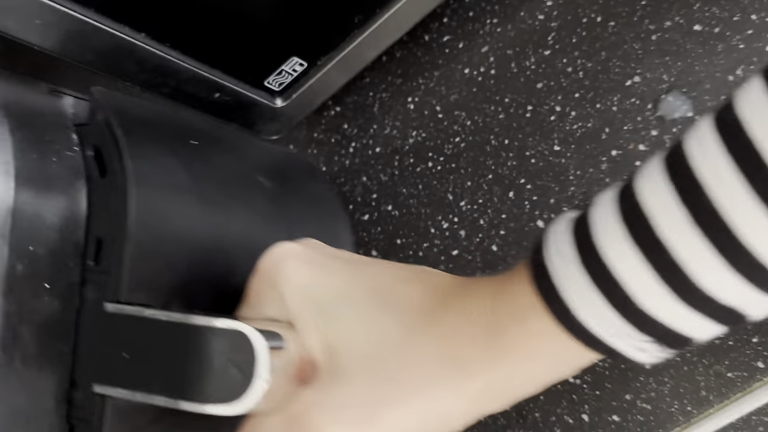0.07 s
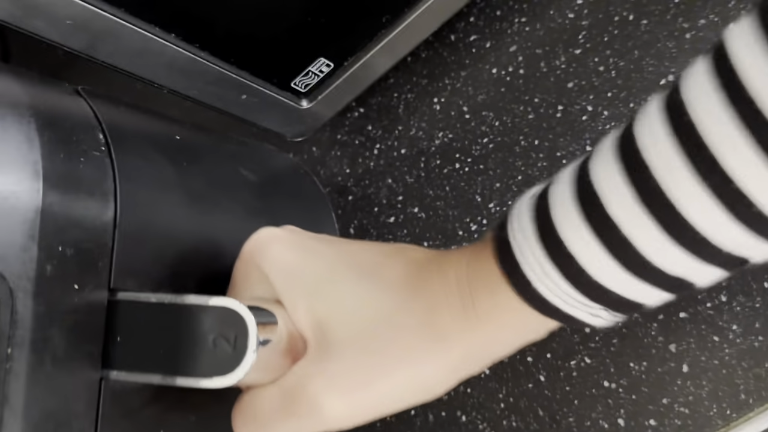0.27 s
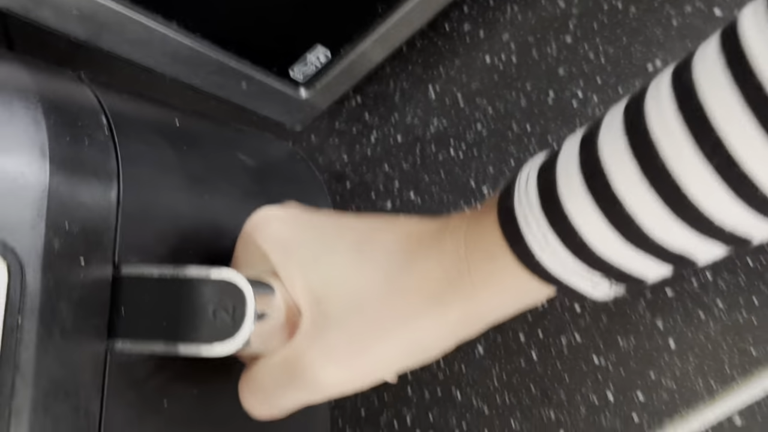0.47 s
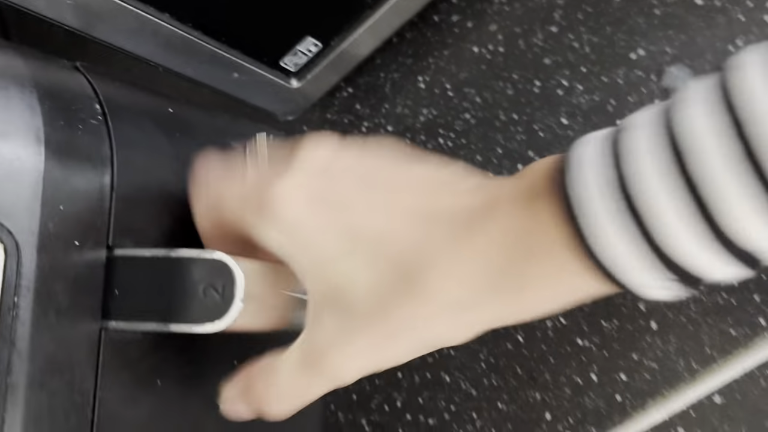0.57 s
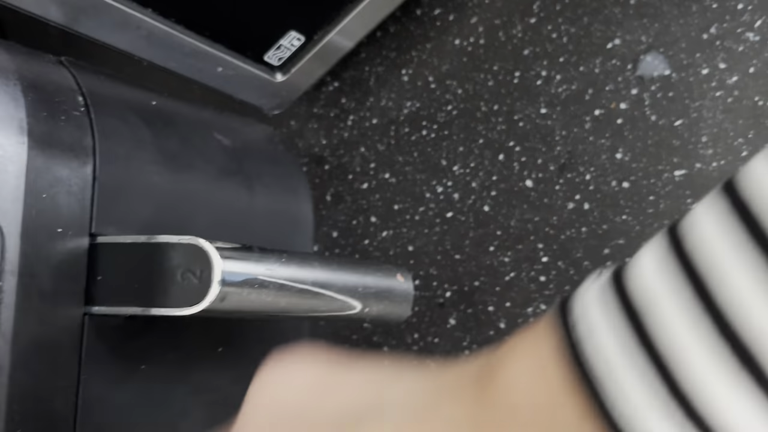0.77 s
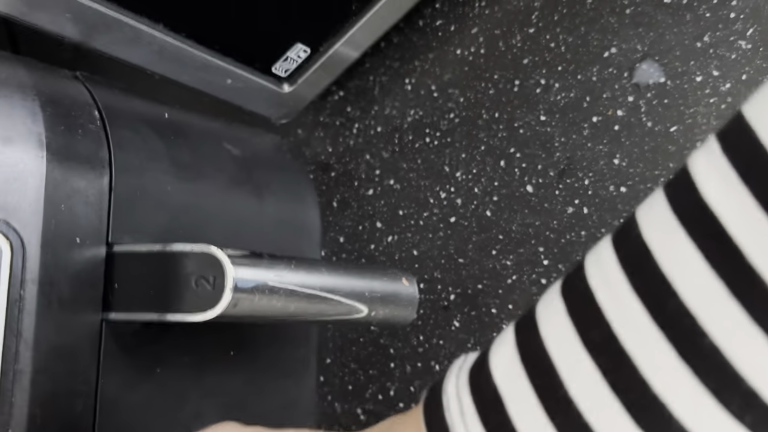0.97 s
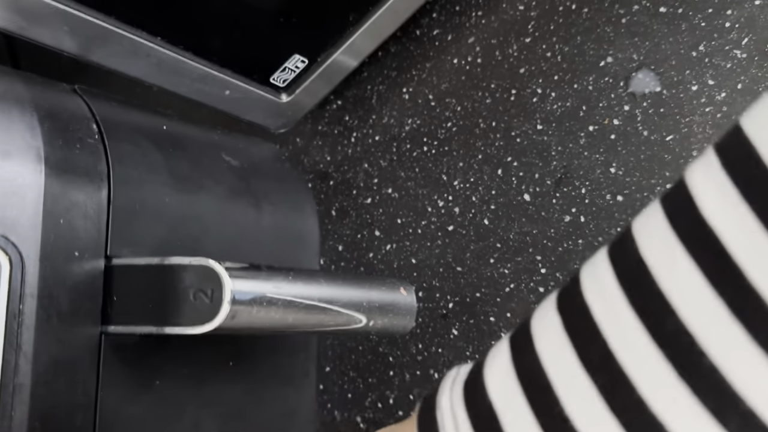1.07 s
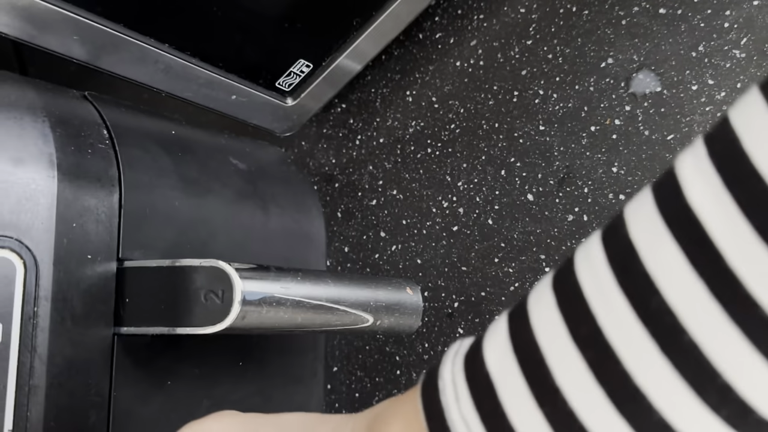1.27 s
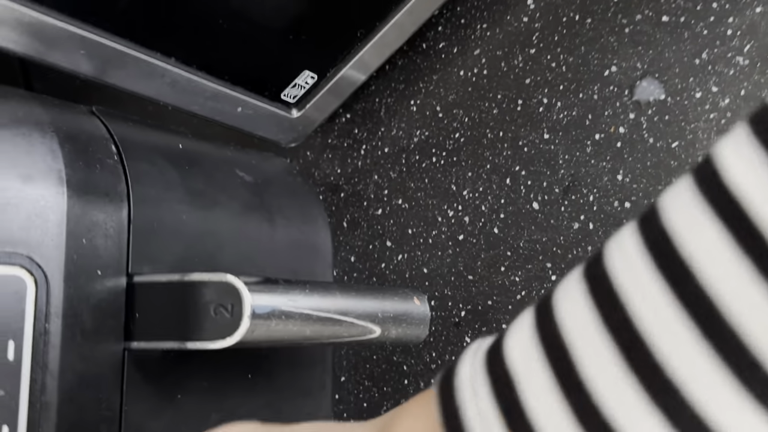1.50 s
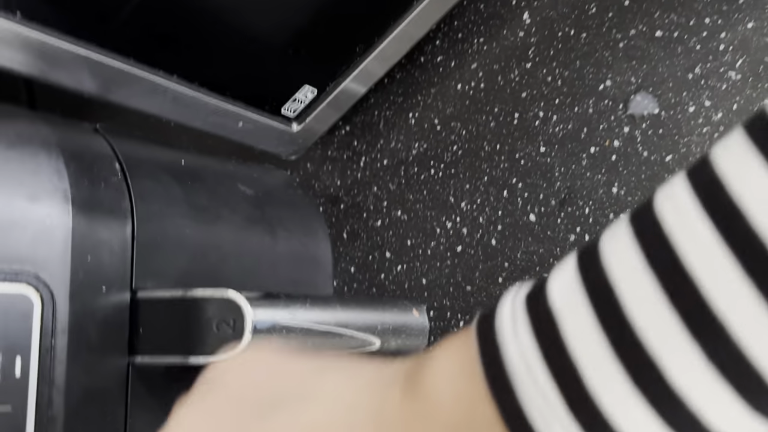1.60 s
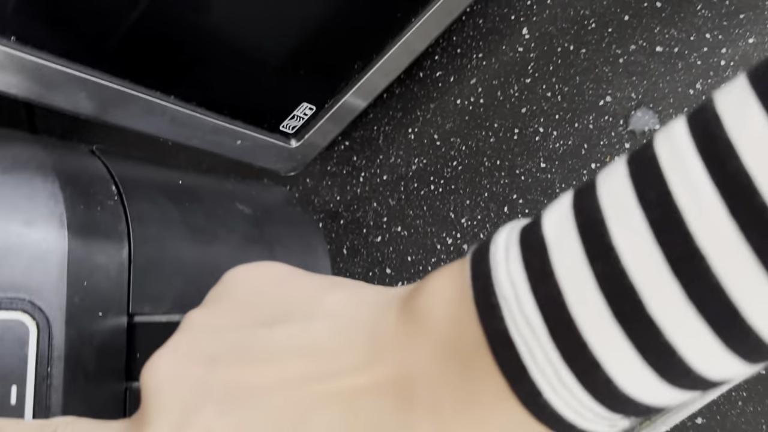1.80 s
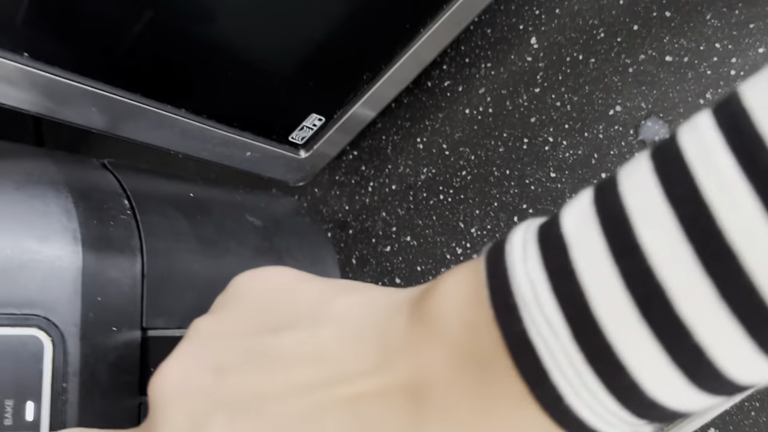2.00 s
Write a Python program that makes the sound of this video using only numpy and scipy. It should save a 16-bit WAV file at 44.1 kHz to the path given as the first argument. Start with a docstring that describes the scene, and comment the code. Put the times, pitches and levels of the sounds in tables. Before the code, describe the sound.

An air fryer drawer knocks shut, then a control clicks down and up twice.

```python
"""A small kitchen: quiet air, faint appliance hum, a deep tone that swells and fades throughout.
A hand shifts on the handle of an air fryer's plastic drawer and pushes it home. The drawer knocks on
the housing and scrapes over runners and catch; the appliance booms on its feet, the catch snaps,
the drawer seats with a low clunk and the hand lets go. Then a control clicks down and up, twice."""
import sys
import numpy as np
from scipy import signal
from scipy.fft import rfft, irfft, next_fast_len
from scipy.io import wavfile

SR = 44100
rng = np.random.default_rng(int(sys.argv[2]) if len(sys.argv) > 2 else 0)


def log_audio(samples):
    """Write samples as a 16-bit WAV file to the path given in sys.argv[1]."""
    # one column per channel
    frames = np.atleast_2d(samples).T
    # limit to full scale, then quantise
    limited = np.clip(frames, -1, 1)
    pcm = np.round(limited * 32767).astype(np.int16)
    wavfile.write(sys.argv[1], SR, pcm)


N = 90404


def from_db(db):
    """Decibels to gain."""
    return 10 ** (np.asarray(db) / 20)


def seconds():
    """Sample times."""
    return np.arange(N) / SR


def noise():
    """White noise, rms 1."""
    return rng.standard_normal(N)


def decay(start_s, t60_s):
    """Step to 1, then exponential decay."""
    age_s = seconds() - start_s
    return (age_s >= 0) * np.exp(-np.log(1000) * np.maximum(age_s, 0) / t60_s)


def drift(corner_hz):
    """Smooth random drift, standard deviation 1."""
    hop, settle = 40, 2000
    pole = np.exp(-2 * np.pi * corner_hz * hop / SR)
    white = rng.standard_normal(N // hop + settle + 2)
    slow = signal.lfilter([1], [1, -2 * pole, pole * pole], white)[settle:]
    return np.interp(np.arange(N) / hop, np.arange(len(slow)), slow / slow.std())


def coloured(x, spectrum, treble_db=0):
    """Minimum-phase filter: spectrum (f/Hz, level/dB) scaled to unit power gain, then a 3 kHz shelf."""
    size = 2 * next_fast_len(N)
    hz = np.maximum(np.arange(size // 2 + 1) * SR / size, 1)
    points_hz, db = np.transpose(spectrum)
    gain = from_db(np.interp(np.log(hz), np.log(points_hz), db))
    shelf = from_db(treble_db * hz ** 2 / (hz ** 2 + 3000 ** 2))
    gain = gain / np.sqrt(np.mean(gain ** 2)) * shelf
    cepstrum = irfft(np.log(gain))
    causal = np.r_[cepstrum[0], 2 * cepstrum[1:size // 2]]
    return irfft(rfft(x, size) * np.exp(rfft(causal, size)))[:N]


def ring(start_s, hz, t60_s):
    """One struck mode."""
    return decay(start_s, t60_s) * np.sin(2 * np.pi * hz * (seconds() - start_s))


def crack(start_s, t60_s):
    """Dense tiny modes as a decaying noise burst."""
    return decay(start_s, t60_s) * rng.choice([-1, 1], N)


def contact(start_s, rise_s):
    """Plastic yields, so force builds gradually."""
    return 1 - np.exp(-np.maximum(seconds() - start_s, 0) / rise_s)


def air():
    """Room air: steady dark noise."""
    # noise spectrum: f/Hz, relative density/dB
    spectrum = [(20, -28), (35, 3.5), (60, -0.5), (90, -1), (160, 0), (240, -2), (320, -9), (390, -4.5),
                (480, -10.5), (600, -10.5), (900, -14), (1250, -19.5), (1650, -20), (1950, -21.5),
                (2300, -21.5), (2750, -29.5), (3400, -31), (4700, -34), (7700, -33.5), (10000, -48),
                (15000, -59.5)]
    return from_db(-52) * coloured(noise(), spectrum)


def hum():
    """Appliance hum: faint wavering lines over a deep tone that swells and fades."""
    # deep tone's envelope: t/s, rms level/dB
    swell = [(0, -52), (0.15, -69), (0.25, -48.5), (0.54, -53), (0.64, -61), (0.88, -52.5), (1.03, -46),
             (1.25, -45), (1.33, -54), (1.39, -62), (1.44, -51), (1.54, -44), (1.68, -43.5), (1.85, -51),
             (2.05, -48.5)]
    # hum lines: f/Hz, rms level/dB
    lines = [(100, -59), (134, -60.5), (226, -64.5), (268.5, -59), (426, -68), (490, -74.5), (581, -72),
             (1022, -75.5), (1610, -80.5), (2126, -78.5), (2304, -82.5), (3400, -85)]
    deep_hz, wander_hz, waver_db = 52.45, 1.85, 3
    t = seconds()
    out = from_db(np.interp(t, *np.transpose(swell))) * np.sin(2 * np.pi * deep_hz * t)
    for hz, db in lines:
        cycles = np.cumsum(hz + wander_hz * drift(corner_hz=3.26)) / SR + rng.random()
        out += from_db(db + waver_db * drift(corner_hz=4.4)) * np.sin(2 * np.pi * cycles)
    return np.sqrt(2) * out


def hand():
    """Skin brushes the handle as the hand shifts and lets go."""
    # brushes: t/s, length/s, level/dB
    brushes = [(0.146, 0.012, -68), (0.569, 0.035, -66.5), (0.608, 0.015, -65)]
    # skin friction: f/Hz, relative density/dB
    spectrum = [(1000, -11), (3000, -5.5), (6500, 9), (9000, -2.5), (15000, -11)]
    touch = sum(from_db(db) * np.exp(-2 * ((seconds() - peak_s) / length_s) ** 2)
                for peak_s, length_s, db in brushes)
    return coloured(touch * noise(), spectrum)


def knocks():
    """Knocks ring the hollow drawer; walls crack, loose parts buzz. Seating damps the modes."""
    # hits on the housing: t/s, thud/dB, body/dB, hollow ring/dB, crack/dB
    hits = [(0.2154, -65, -43, -24, -31), (0.2225, -24.5, -32, -53, -53), (0.2730, -42, -27, -22.5, -38),
            (0.2893, -36.5, -57, -33.5, -24.5), (0.2930, -47, -20, -22, -41),
            (0.3055, -29, -31.5, -27, -54), (0.315, -50, -41, -33.5, -53), (0.3365, -43, -35, -45, -60)]
    # drawer and housing modes: f/Hz, level/dB, t60/s
    modes = [(160, -6.5, 0.147), (186, -2, 0.096), (282.5, -3.5, 0.073), (297, -1, 0.038),
             (371, -1.5, 0.083), (437.5, -7, 0.11), (518.2, 0, 0.08), (550, -11.5, 0.1), (624, -21, 0.14),
             (739, -12.5, 0.077), (981, -16.5, 0.064), (1130, -23.5, .11), (1273, -15, 0.062),
             (1325, -12.5, 0.029), (2095, -26.5, 0.046), (2520, -27.5, 0.056)]
    # dense short modes of the plastic: f/Hz, relative density/dB
    wall_spectrum = [(150, -39.5), (400, 10.5), (800, -0.5), (1300, -8.5), (1700, -5.5), (2400, -15.5),
                     (3300, -15), (6000, -24), (9000, -31), (16000, -54)]
    thud_below_hz, body_below_hz = 230, 480
    seated_s, seated_t60_s = 0.321, 0.08
    ringing, walls = 0, 0
    for start_s, thud_db, body_db, ring_db, crack_db in hits:
        force = contact(start_s, rise_s=0.00092)
        clamped_s = np.maximum(seconds() - max(start_s, seated_s), 0)
        damping = np.exp(-np.log(1000) * clamped_s / seated_t60_s)
        for hz, db, t60_s in modes:
            band_db = thud_db if hz < thud_below_hz else body_db if hz < body_below_hz else ring_db
            ringing += from_db(db + band_db) * force * damping * ring(start_s, hz, t60_s)
        burst = crack(start_s, t60_s=0.028)
        buzz = from_db(-8.5) * crack(start_s, t60_s=0.12)
        walls += from_db(crack_db) * force * (burst + buzz)
    return ringing + coloured(walls, wall_spectrum)


def scrapes():
    """Plastic rubs over runners and catch in short runs of dense slips."""
    # runs: t/s, length/s (first half held, then decay), level/dB, treble/dB
    runs = [(0.241, 0.013, -43.5, -2.5), (0.255, .012, -55.5, 6), (0.268, 0.034, -37, -13)]
    # plastic friction: f/Hz, relative density/dB
    spectrum = [(200, -17), (600, -3), (1400, 3), (2400, 4), (3300, -8), (5000, -9), (6800, -4.5),
                (9000, -18.5), (16000, -32)]
    slips_per_s, release_s = 5000, 0.0088
    slip_chance = slips_per_s / SR
    t, out = seconds(), 0
    for start_s, length_s, db, treble_db in runs:
        slips = noise() * (rng.random(N) < slip_chance) / np.sqrt(slip_chance)
        envelope = (t >= start_s) * np.exp(-np.maximum(t - start_s - length_s / 2, 0) / release_s)
        out += from_db(db) * coloured(slips * envelope, spectrum, treble_db)
    return out


def rocking():
    """The push sets the appliance booming on its feet."""
    # jolts: t/s, level/dB
    jolts = [(0.255, -37), (0.306, -38.5), (0.331, -39.5)]
    # rocking modes: f/Hz, level/dB, t60/s
    modes = [(62, -20.5, 0.18), (85, 2.5, 0.33)]
    return sum(from_db(jolt_db + mode_db) * ring(start_s, hz, t60_s)
               for start_s, jolt_db in jolts for hz, mode_db, t60_s in modes)


def catch():
    """The spring catch gives one bright snap."""
    # snap: f/Hz, relative density/dB
    spectrum = [(1000, -3.5), (4000, -16), (5400, -18.5), (6300, -1.5), (7100, -7.5), (7900, -13),
                (10000, -25), (15000, -22)]
    return from_db(-27.5) * coloured(crack(start_s=0.2834, t60_s=0.02), spectrum)


def clicks(flips, spectrum, t60_s, rise_s):
    """Each switch flip: a crack and a brief ring, echoed by a nearby surface."""
    echo_s, echo_db = 0.008, -12.5
    t, direct = seconds(), 0
    for start_s, crack_db, ring_hz, ring_db, ring_t60_s, treble_db in flips:
        force = contact(start_s, rise_s)
        direct += from_db(crack_db) * coloured(force * crack(start_s, t60_s), spectrum, treble_db)
        direct += from_db(ring_db) * force * ring(start_s, ring_hz, ring_t60_s)
    return direct + from_db(echo_db) * np.interp(t - echo_s, t, direct, left=0)


def presses():
    """The control flips down with a sharp click."""
    # down strokes: t/s, crack/dB, ring f/Hz, ring level/dB, ring t60/s, treble/dB
    flips = [(1.3836, -37, 5800, -40, 0.019, -2.5), (1.8637, -40.5, 4350, -31, 0.0061, 1)]
    # crack: f/Hz, relative density/dB
    spectrum = [(300, -10), (900, 0), (1700, 1.5), (2700, -7.5), (3700, 4), (5000, -11.5), (6800, 3.5),
                (9300, -6), (10800, -12), (15000, -14)]
    return clicks(flips, spectrum, t60_s=0.026, rise_s=0.0001)


def releases():
    """The control flips back up with a duller, longer click."""
    # up strokes: t/s, crack/dB, ring f/Hz, ring level/dB, ring t60/s, treble/dB
    flips = [(1.5284, -36, 1590, -39, 0.0068, -2.5), (2.0319, -41.5, 2130, -36, .012, 7)]
    # crack: f/Hz, relative density/dB
    spectrum = [(200, -25), (450, -3), (1000, 0.5), (1550, 3.5), (2400, -1), (2900, -10.5), (4200, -8.5),
                (5000, -17.5), (5900, -14), (8200, -19.5), (10500, -30), (15000, -31)]
    return clicks(flips, spectrum, t60_s=0.041, rise_s=0.0007)


def kitchen(x):
    """Diffuse reflections of a small room."""
    # colour of the reflections: f/Hz, relative level/dB
    spectrum = [(60, -8), (250, 4), (520, 3.5), (1000, 2.5), (2000, -2), (6000, -4), (15000, -4)]
    tail = noise() * decay(start_s=0.0054, t60_s=0.24)
    tail /= np.sqrt(np.sum(tail ** 2))
    return signal.fftconvolve(x, coloured(tail, spectrum))[:N]


def scene():
    """Drawer and control close by in the humming kitchen; mono."""
    drawer = knocks() + scrapes() + catch() + hand()
    control = presses() + releases()
    reflections = kitchen(from_db(-15) * drawer + from_db(-11.5) * control)
    return (drawer + rocking() + control + reflections + hum() + air())[None]


def record(dry):
    """Microphone: lowest bass shed, deep dip near 12 kHz, very top cut."""
    # microphone response: f/Hz, relative level/dB
    response = [(15, -26), (38, -2.5), (48, -0.5), (10200, 1.5), (11500, -18.5), (12600, -16), (14000, 3),
                (16000, 0.5)]
    cutoff_hz = 16400
    lowpass = signal.ellip(10, 0.1, 80, cutoff_hz, fs=SR, output="sos")
    return signal.sosfilt(lowpass, coloured(dry[0], response))[None]


dry = scene()
out = record(dry)
log_audio(out)
```